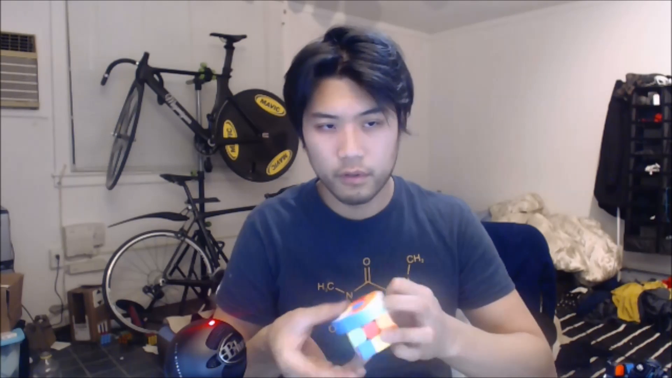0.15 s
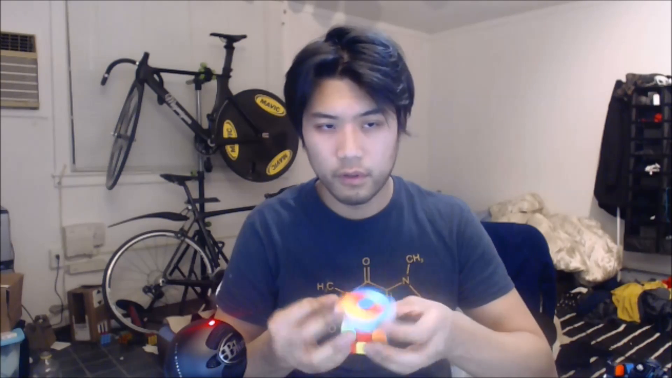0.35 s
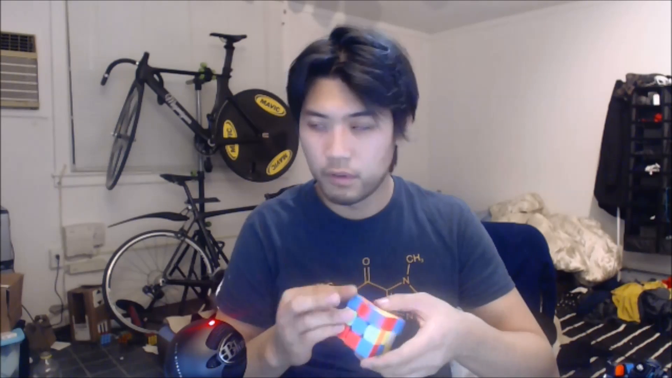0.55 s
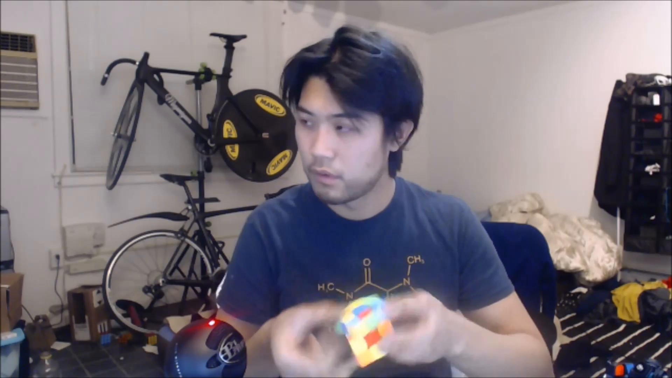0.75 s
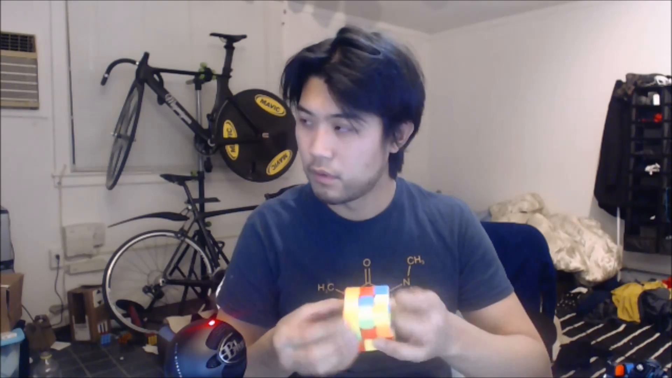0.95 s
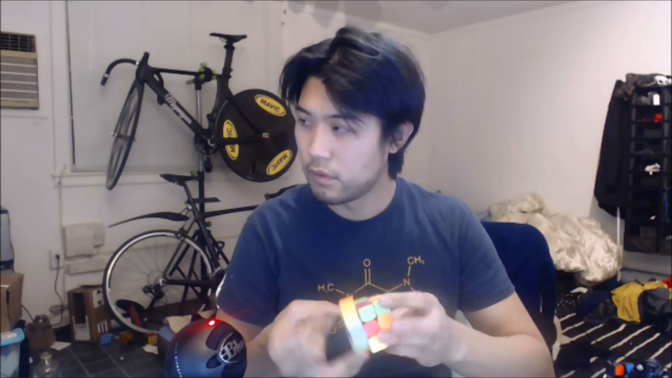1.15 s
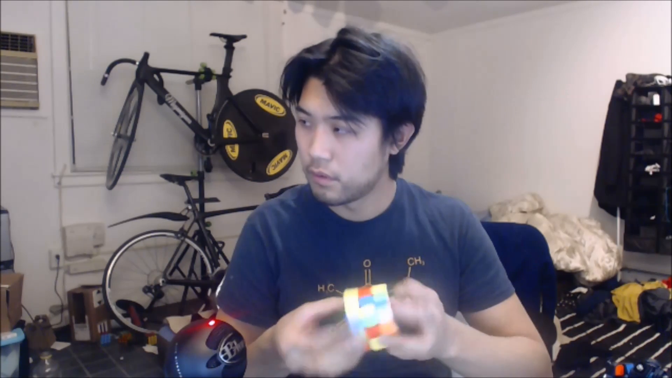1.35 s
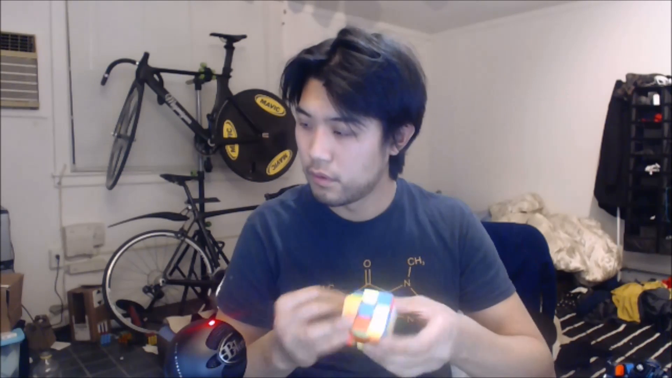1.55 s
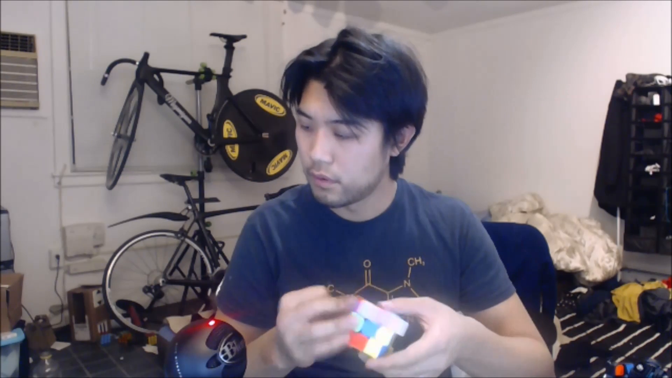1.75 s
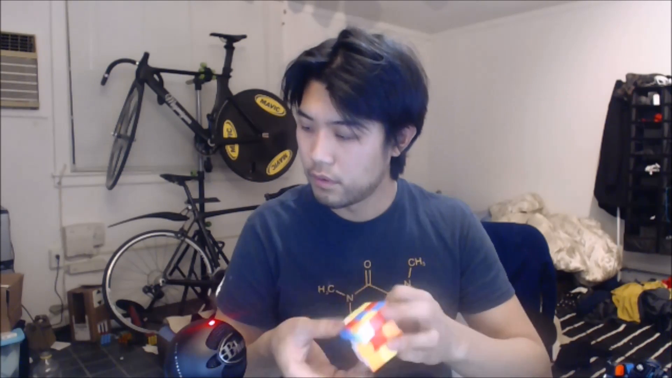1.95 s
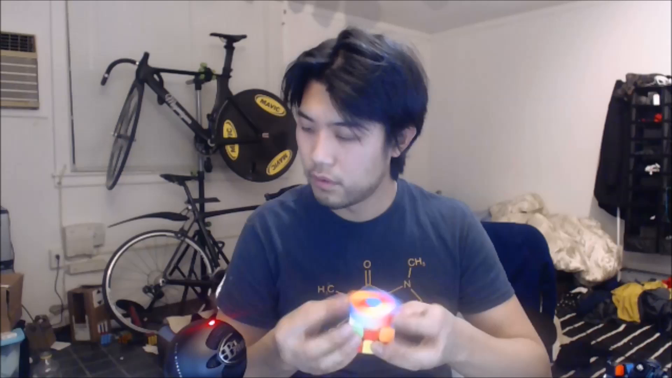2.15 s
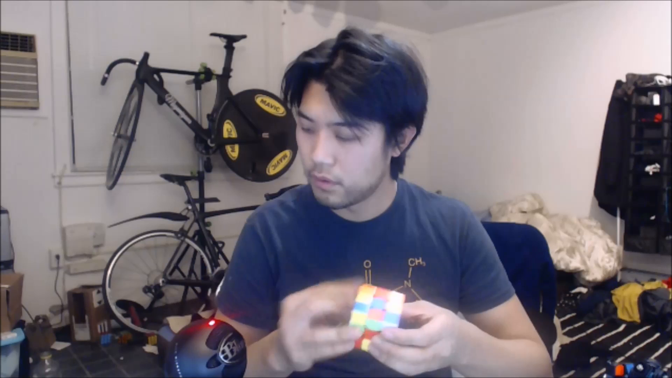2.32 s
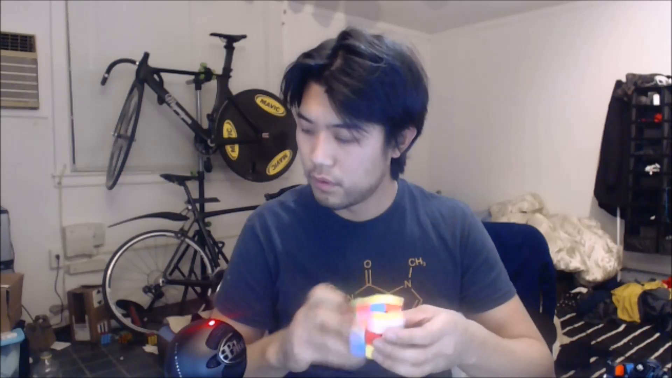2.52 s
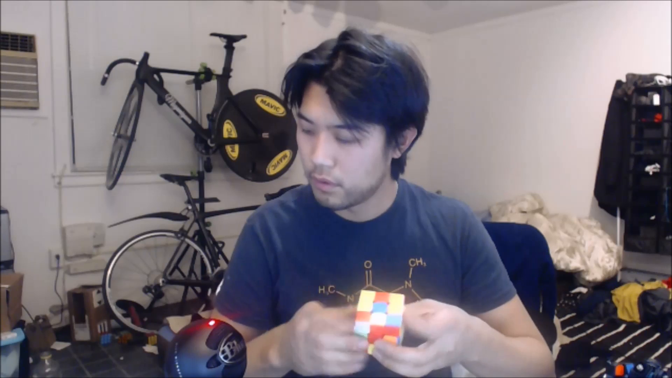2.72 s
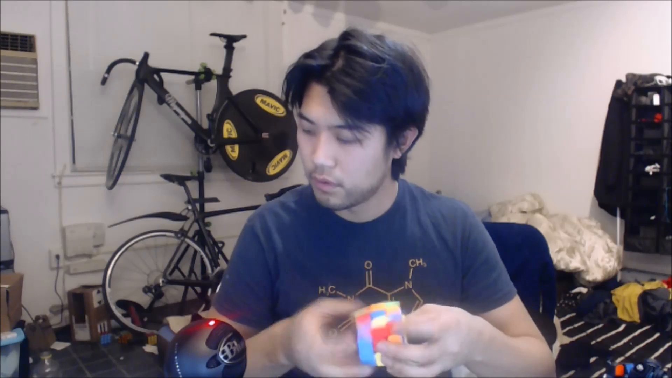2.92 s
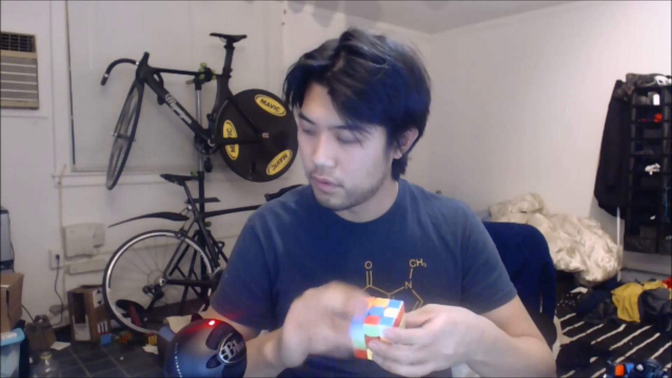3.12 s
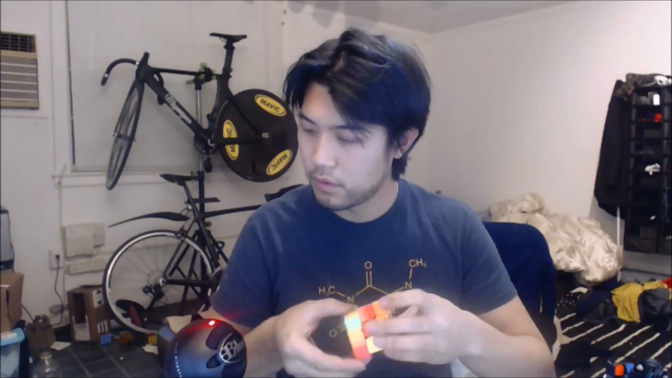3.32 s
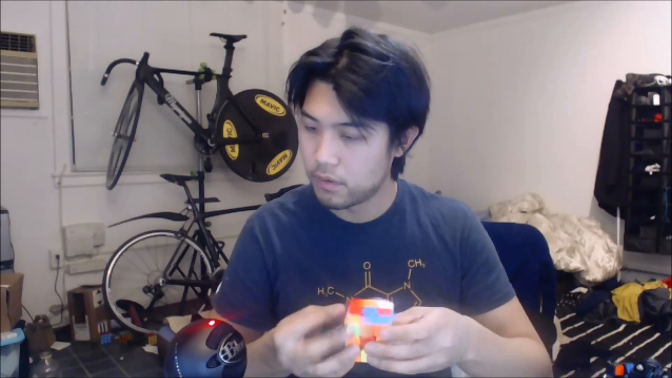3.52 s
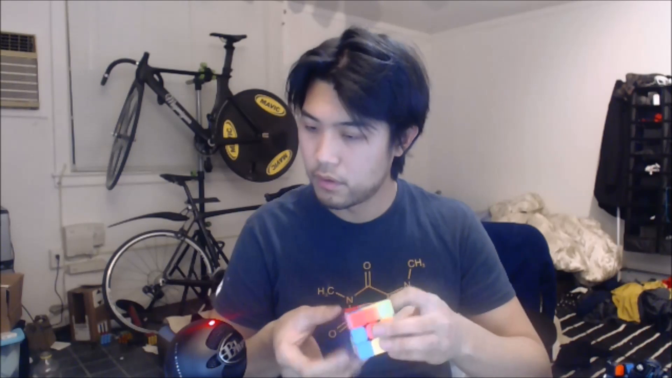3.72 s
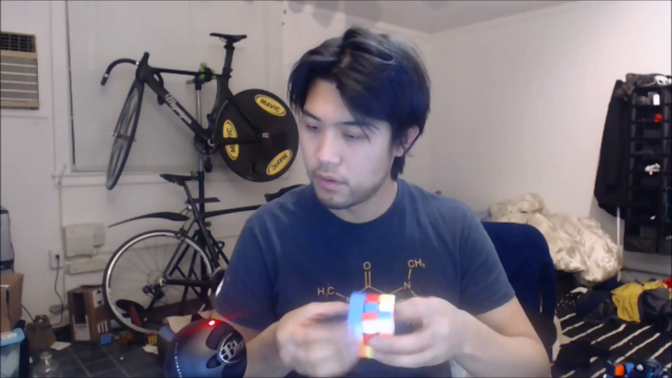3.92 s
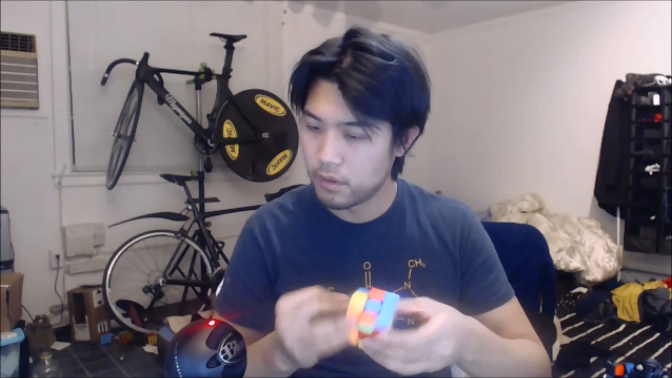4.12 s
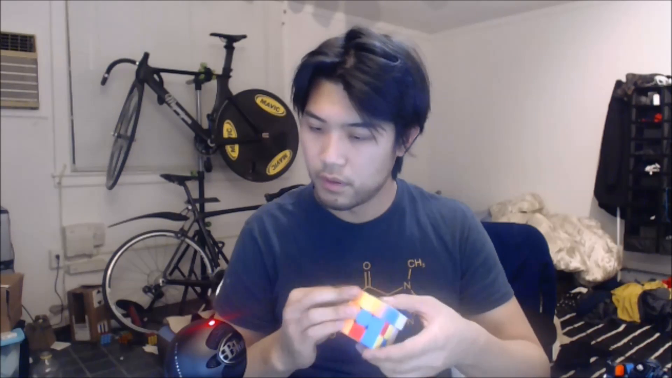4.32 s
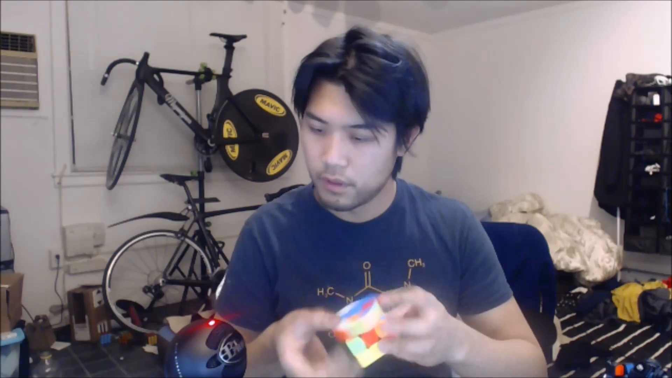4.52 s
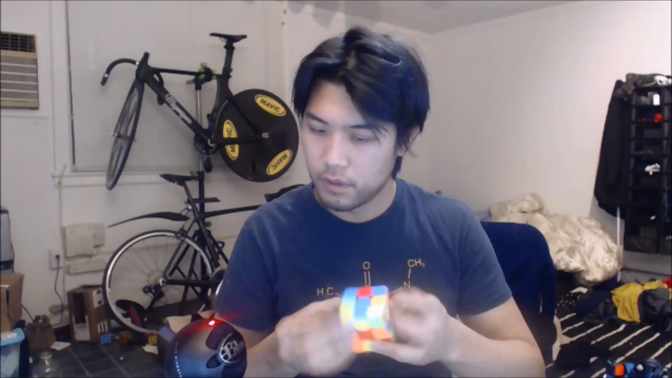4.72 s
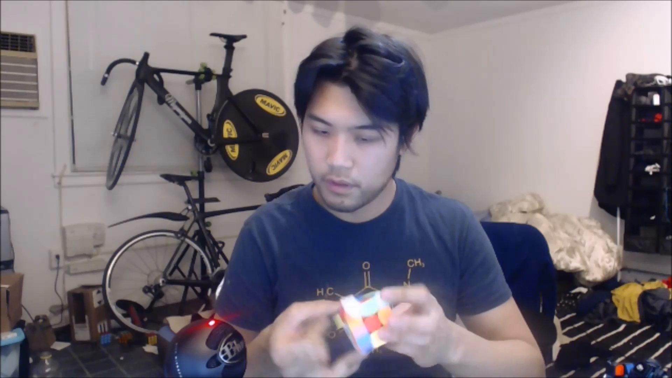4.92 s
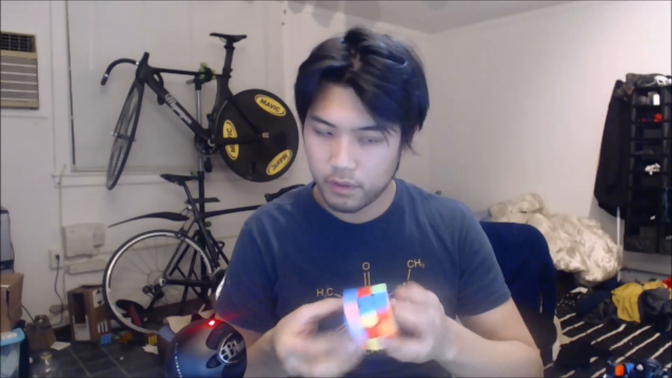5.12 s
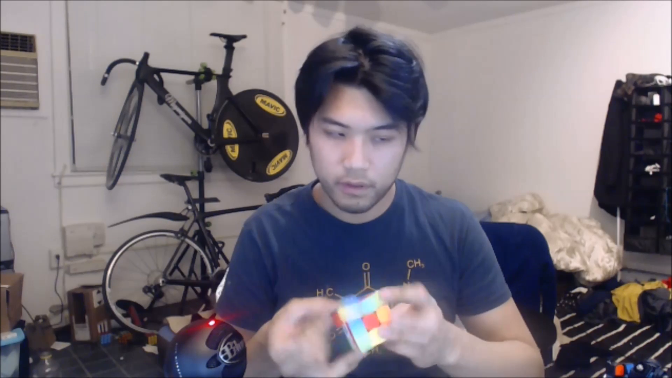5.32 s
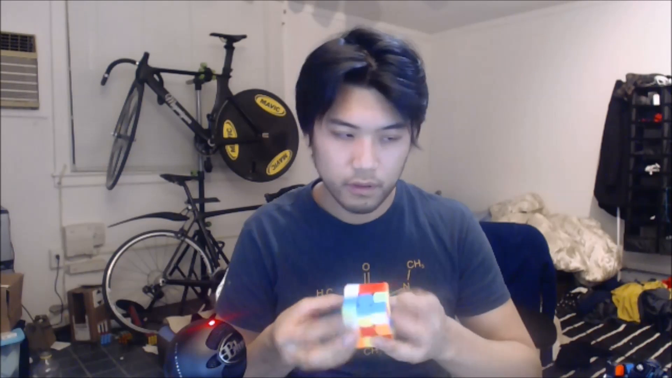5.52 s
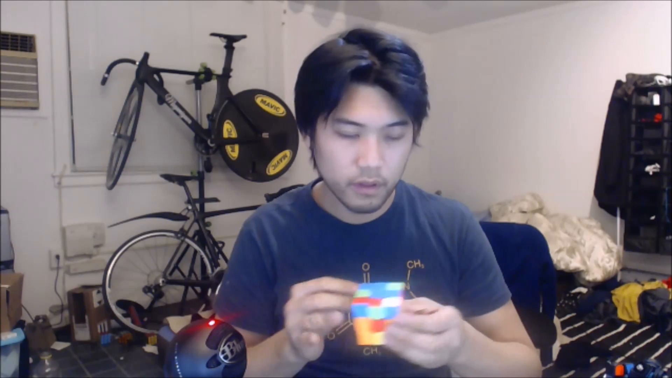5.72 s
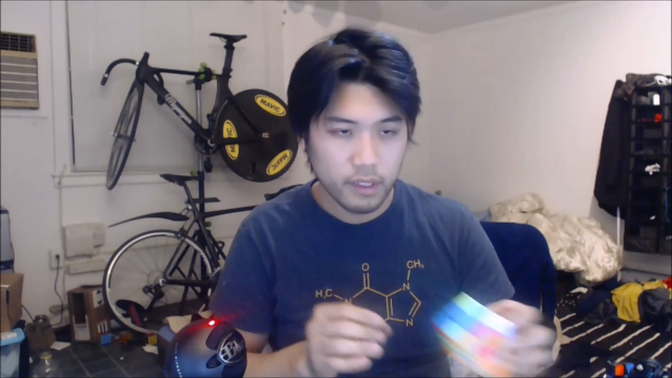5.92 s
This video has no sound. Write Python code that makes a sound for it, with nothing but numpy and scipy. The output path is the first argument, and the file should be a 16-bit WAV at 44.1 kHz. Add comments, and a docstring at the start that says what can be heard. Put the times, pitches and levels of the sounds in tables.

```python
"""In a small bedroom, a plastic speed cube is turned fast by hand near a webcam microphone.
Each turn rubs layer on layer (noise gated by small ticks); loose pieces clack (bursts of contact noise).
Both pass a colour filter (shells and microphone together), ring hollow (decaying modes) and echo in the room.
Moving hands add rumble, swings and thuds; below lie a fan's hum, room noise and a faint low rumble.
The microphone rounds off the highest peaks and cuts the top of the treble."""
import sys
import numpy as np
from scipy import signal
from scipy.fft import rfft, irfft
from scipy.io import wavfile
from scipy.ndimage import uniform_filter1d

SR = 44100
rng = np.random.default_rng(int(sys.argv[2]) if len(sys.argv) > 2 else 0)


def generate_wav(signal):
    """Clip the signal to [-1, 1] and save it as 16-bit WAV at the path in sys.argv[1]."""
    frames = np.transpose(np.atleast_2d(signal))
    scaled = np.clip(frames, -1, 1) * 32767
    pcm = np.round(scaled).astype(np.int16)
    wavfile.write(sys.argv[1], SR, pcm)


N = 267069


def undb(db):
    """Level: decibels become an amplitude ratio."""
    return 10 ** (np.asarray(db) / 20)


def unit(x):
    """Normalisation: scale to an rms of 1."""
    return x / np.sqrt(np.mean(x ** 2) + 1e-24)


def curve(rows):
    """Linear interpolation: join (t/s, value) rows by straight lines."""
    s, value = np.transpose(rows)
    return np.interp(np.arange(N) / SR, s, value)


def response(points, size=2048):
    """Minimum phase: folding the cepstrum gives a causal impulse response of the given (f/Hz, level/dB)."""
    hz, db = np.transpose(points)
    grid = np.maximum(np.fft.rfftfreq(size, 1 / SR), 1)
    level_db = np.interp(np.log(grid), np.log(hz), db)
    cepstrum = irfft(np.log(undb(level_db)))
    cepstrum[1:size // 2] *= 2
    cepstrum[size // 2 + 1:] = 0
    return irfft(np.exp(rfft(cepstrum)))


def through(x, impulse):
    """Linear filtering: convolve, keeping the length."""
    return signal.fftconvolve(x, impulse)[:len(x)]


def noise(points):
    """Spectral shaping: white noise filtered to the given colour, rms 1."""
    return unit(through(rng.standard_normal(N), response(points, size=16384)))


def split(x, hz, order=4):
    """Band splitting: the parts below and above a frequency."""
    low = signal.butter(order, hz, "low", fs=SR, output="sos")
    high = signal.butter(order, hz, "high", fs=SR, output="sos")
    return signal.sosfilt(low, x), signal.sosfilt(high, x)


# Clacks of pieces snapping home: t/s, level/dB (before the room), hollow ring re clack (relative)/dB,
# time scale of the contact/ms
CLACK_EVENTS = [(.018, -20, -7, 0.73), (.036, -4, -13, 1.5), (.080, -22, 3, 1.7), (.137, -14, 6, 2.6),
                (.158, -14.5, -1, 4), (.196, -19, 6, 2.6), (.262, -20, 12, 2.4), (.270, -17, -15, 0.84),
                (.324, -19, 5.5, 2.5), (.339, -11, -5, 2.6), (.423, -19.5, -3, 3), (.510, -21, 3.5, 2.8),
                (.628, -12.5, 1.5, 6.7), (.700, -12, -0.5, 2.3), (.739, -14, 1.5, 1.8), (.769, -11, 1, 1),
                (.784, -13.5, -5, 1.5), (.792, -18, -2, 1.3), (.810, -6.5, -6, 1.5), (.832, -14.5, 1, 2.4),
                (.857, -17, 4, 2.2), (.876, -24.5, -10, 2.3), (.915, -17.5, 2.5, 1.6),
                (.930, -1, -4.5, 1.9), (.950, -16, -16, 2.1), (.968, -19, 1, 1.7), (1.076, -8.5, -6, 1.7),
                (1.147, -9, -2.5, 3.2), (1.159, -1, -8, 3.5), (1.205, -20.5, 8, 1.8),
                (1.245, -9.5, -3, 1.6), (1.268, -16.5, 8, 5.2), (1.341, -16, 7.5, 2.6),
                (1.360, -2.5, -22, 1.3), (1.372, -20.5, 5, 1.8), (1.397, -19, -1, 1.8),
                (1.452, -16, 3.5, 4.4), (1.471, -13, -2, 1.2), (1.482, -13, 1.5, 3.5),
                (1.558, -16, -9, 0.52), (1.571, -19.5, 1, 2.8), (1.728, -22, 9, 2.1),
                (1.740, -23.5, 10.5, 2.8), (1.777, -19, -2, 1.4), (1.807, -12, 1.5, 6.4),
                (1.814, -13.5, 1, 4.5), (1.858, -11.5, -2.5, 2.4), (1.887, -18, 7.5, 1),
                (1.901, -20, -18, .7), (1.926, -11.5, -2.5, 3), (1.962, -10, 3, 3.7), (1.979, -20, 1, 2.2),
                (1.987, -15, -17, 3.4), (2.010, -23.5, -12, 2), (2.045, -13, 4, 1.25),
                (2.061, -5.5, -3, 1.9), (2.105, -25.5, 11.5, 0.84), (2.188, -19, 4, 3.2),
                (2.203, -14, 3.5, 2.4), (2.279, -16, -1.5, 5.9), (2.352, -33, 7.5, 2.4),
                (2.373, -25.5, -4, 0.76), (2.429, -21.5, -5, 1.8), (2.460, -22, 8.5, 2.1),
                (2.476, -20, -10, 1.4), (2.553, -8.5, -14, 2.3), (2.582, -18, -14, 1.2),
                (2.590, -11.5, 4, 3.9), (2.666, -18, 4, 2.9), (2.781, -21, 6.5, 1.2), (2.852, -13, 1, 4.7),
                (2.910, -22, 5, 1.5), (2.926, -15, 5.5, 1.9), (2.946, -1, -7, 3.2), (2.965, -5, -7, 1.5),
                (2.984, -8, 4, 1.6), (2.997, -7, -0.5, 1.8), (3.024, -19, -17, 0.56), (3.120, -23, 2.5, 2),
                (3.192, -11, 1.5, 2.4), (3.227, -19, -10, 2.4), (3.241, -19, -15, 4.5), (3.257, -16, 5, 1),
                (3.310, -34, 15.5, 1), (3.349, -28.5, 6, 2.7), (3.389, -4.5, -12, 1.85),
                (3.398, -11, -14, 2.6), (3.413, -12, -5, 3.8), (3.559, -17, 2.5, 1.9),
                (3.619, -4.5, -9, 6.1), (3.631, -3.5, -28, 2.2), (3.676, -13, -1, 2.6),
                (3.710, -8.5, -1, 2.2), (3.731, -17.5, -1, 5.6), (3.741, -13, -5, 2.5),
                (3.751, -15.5, 4, 0.78), (3.908, -16, 4.5, 3.6), (3.921, -12, -10, 3.7),
                (3.929, -13, 2, 2.3), (3.954, -25, 7.5, 0.92), (4.051, -11.5, 1.5, 2.1),
                (4.123, -10.5, 0, 1.4), (4.161, -17, -5, 0.78), (4.324, -21, 6.5, 9.2),
                (4.341, -15.5, 6, 2), (4.401, -10.5, -0.5, 1.04), (4.411, -17, -3, 4.2),
                (4.465, -12, -5, 1.2), (4.469, -16.5, -1, 2.1), (4.499, -20, 5, 2.7),
                (4.543, -13.5, 2, 2.2), (4.563, -18, 7.5, 1.8), (4.655, -13, 4.5, 4.3),
                (4.674, -2.5, -8, 1.06), (4.708, -12.5, -14, 1.6), (4.826, -21, 3.5, 1.7),
                (4.836, -6, 1.5, 1.8), (4.848, -9.5, -21, 2.4), (4.888, -23, 5, 3), (4.910, 0, -13, 4),
                (4.936, -18, -12, 0.67), (4.952, -16, 1, 2), (4.988, -15, -3, 0.61),
                (5.001, -7.5, -4.5, 2.2), (5.018, -15, 2, 1.1), (5.039, -23, 2, 2.1),
                (5.077, -20.5, 3, 4.2), (5.121, -9.5, 0.5, 2.5), (5.137, -12.5, -6, 1.9),
                (5.218, -13.5, 0.5, 1.6), (5.234, -24, 5, 2.1), (5.298, -11, -3, 3.6),
                (5.309, -8.5, -2.5, 2.9), (5.354, -18, 2, 1.4), (5.382, -10, 0, 3.1),
                (5.394, -10.5, 3.5, 4), (5.414, -8.5, -6, 4.6), (5.450, -19.5, 9, 1.4),
                (5.490, -22, 1, 2.8), (5.506, -15, 5, 0.91), (5.573, -18.5, 2, 2.8), (5.586, -6, -0.5, 2.5),
                (5.598, -10.5, -4, 3.6), (5.651, -17.5, 6, 2.7), (5.79, -54, -14, 1.5)]
# The treble share varies from clack to clack, and falls very slightly as the level rises
BRIGHT_SPREAD_DB, BRIGHT_DB_PER_DB = 2.5, -0.01


def clacks(rows, rough=0.64, swell=1.47, decay=0.67, steep=1.06, scrape_db=-17, knock=0.52, grip=0.004,
           grip_db=1.5, treble_db=-0.05, hollow_db=-5.0, split_hz=6800, own_ring=0.77, size=2048):
    """Impact excitation: a scrape and a cluster of tiny contacts make the clack; a blow adds to its ring."""
    lead = size // 4
    out = np.zeros(N + 2 * size)
    middle, treble = split(cube_response(), split_hz)
    ms = 1000 * (np.arange(size) - lead) / SR
    scale = np.sqrt(.005 * SR / size)  # refers levels to the rms over 5 ms
    scrape = undb(scrape_db) * np.exp(-np.abs(ms) / 3.5)  # the edges touch before they snap home
    blow = signal.unit_impulse(size, lead + SR // 2000)  # 0.5 ms after the stated moment
    for s, db, ring_db, length_ms in rows:
        # the blow spreads from piece to piece, then dies
        age = np.maximum(ms, 0) / max(length_ms, .5)
        cluster = age ** swell * np.exp(-(age / decay) ** steep)
        contacts = rng.standard_normal(size) * np.exp(rough * rng.standard_normal(size))
        contacts *= scrape + cluster / cluster.max()

        # each piece has a pitch of its own
        piece = signal.iirpeak(rng.uniform(3300, 9000), 9, fs=SR)
        own = contacts + own_ring * signal.lfilter(*piece, contacts)
        bright = undb(BRIGHT_DB_PER_DB * db + BRIGHT_SPREAD_DB * rng.standard_normal())
        clack = unit(through(own, middle)) + undb(treble_db) * bright * unit(through(own, treble))
        clack /= np.hypot(1, bright)  # brightness hardly changes the level

        ring = hollow_ring(1 + grip * rng.standard_normal(), grip_db * rng.standard_normal(len(HOLLOW_MODES)))
        driven_ring = through(unit(contacts) + knock * unit(blow), ring)
        hollow = undb(ring_db + hollow_db) * unit(driven_ring)

        start = max(int(s * SR), 0)
        out[start:start + size] += undb(db) * scale * (clack + hollow)
    return out[lead:lead + N]


# Small clacks of loose pieces: mean level re the rubbing and spread in dB
LOOSE_DB, LOOSE_SPREAD_DB = 2.5, 3.5
# Their mean hollow ring in dB (relative, as in the clack table) and median contact time scale in ms
LOOSE_RING_DB, LOOSE_MS = 3.5, 1.86


def loose_pieces(effort, count=200):
    """Random impacts: clack rows at chance moments, their level following the effort of turning."""
    s = (np.arange(count) + rng.random(count)) / count * (N - 1) / SR
    force, ring, length = rng.standard_normal((count, 3)).T
    effort_db = 20 * np.log10(effort[(s * SR).astype(int)])
    db = effort_db + LOOSE_DB + LOOSE_SPREAD_DB * np.clip(force, -2, 1)
    ring_db = LOOSE_RING_DB + LOOSE_SPREAD_DB * ring
    return np.transpose([s, db, ring_db, LOOSE_MS * np.exp(0.49 * length)])


# Turns of a layer: start t/s, length/s, level of the rubbing (effort)/dB
LAYER_TURNS = [(0, 0.039, -20), (0.096, 0.1, -26), (0.227, 0.047, -28), (0.308, 0.053, -24.5),
               (0.389, 0.06, -29), (.6, 0.052, -22.5), (0.657, 0.051, -28.5), (0.751, 0.12, -23.5),
               (0.906, .06, -25), (1.042, 0.045, -24), (1.13, 0.029, -27.5), (1.195, .12, -29),
               (1.334, 0.073, -23.5), (1.452, .04, -33.5), (1.526, 0.029, -25), (1.602, 0.041, -32.5),
               (1.739, 0.071, -27.5), (1.8, 0.12, -29.5), (1.972, 0.096, -33.5), (2.037, 0.058, -24.5),
               (2.175, .04, -29), (2.255, 0.025, -27), (2.443, 0.053, -26.5), (2.534, 0.056, -25),
               (2.632, .03, -28), (2.756, 0.16, -32.5), (2.908, 0.076, -21.5), (3.072, 0.044, -34),
               (3.166, 0.069, -27.5), (3.272, 0.027, -33), (3.345, .04, -36.5), (3.381, .045, -25),
               (3.519, 0.05, -28), (3.599, 0.068, -23.5), (3.696, 0.067, -28), (3.891, 0.062, -23),
               (4.022, 0.046, -26), (4.096, 0.046, -26), (4.165, 0.058, -33.5), (4.31, 0.087, -29),
               (4.393, 0.053, -29.5), (4.5, 0.08, -26.5), (4.645, 0.071, -25), (4.814, 0.014, -23),
               (4.884, 0.028, -15.5), (4.98, .04, -19.5), (5.085, 0.13, -33), (5.18, 0.075, -28),
               (5.305, 0.017, -27.5), (5.337, 0.13, -26), (5.486, 0.027, -22.5), (5.559, 0.042, -24),
               (5.623, 0.023, -27)]
TURN_ATTACK_S, TURN_RELEASE_S = 0.0069, 0.022  # the finger gets the layer moving; it coasts to rest
GRIP_RUB_DB, LET_GO_S = -47, 5.68  # the layers shift faintly as long as the cube is gripped


def turning():
    """Amplitude envelope: the rubbing of each turn rises, holds and decays exponentially."""
    t = np.arange(N) / SR
    effort = undb(GRIP_RUB_DB) * np.exp(-np.maximum(t - LET_GO_S, 0) / TURN_RELEASE_S)
    for s, length_s, db in LAYER_TURNS:
        span = slice(max(int(s * SR), 0), int((s + length_s) * SR) + SR // 2)
        age = t[span] - s
        rise = np.clip(age / TURN_ATTACK_S, 0, 1)
        coast = np.exp(-np.maximum(age - length_s, 0) / TURN_RELEASE_S)
        effort[span] = np.maximum(effort[span], undb(db) * rise * coast)
    return effort


def rattle(effort, per_second=330, tick_s=0.00064, hollow_db=-6, soft_hz=12000, rub=0.24, uneven_db=4):
    """Friction noise: edges catch in uneven ticks over a thin rub, coloured and ringing as the clacks are."""
    sizes = undb(uneven_db * np.clip(rng.standard_normal(N), -2, 2))
    ticks = (rng.random(N) < per_second / SR) * sizes
    age = np.arange(SR // 100) / (tick_s * SR)
    catching = rub + unit(through(ticks, age * np.exp(-age)))
    contacts = split(catching * rng.standard_normal(N), soft_hz, order=1)[0] * effort
    colour, ring = cube_response(), hollow_ring(0.98, np.zeros(len(HOLLOW_MODES)))
    body = colour / np.linalg.norm(colour) + undb(hollow_db) * ring / np.linalg.norm(ring)
    return through(contacts, body)


# Colour of the clacks and rubbing as the webcam hears them, shells and microphone together:
# f/Hz, level (relative)/dB
CUBE_COLOUR = [(200, -14.5), (620, -43.5), (1000, -10.5), (2100, -5.5), (2750, -10.5), (3400, -5.5),
               (3750, -9), (4800, 0.5), (5900, 2.5), (6750, -3.5), (8450, 2.5), (9700, -14.5), (13000, -5),
               (15800, -13.5)]


def cube_response():
    """Linear filtering: shells and microphone together give one colour to clacks and rubbing."""
    return response(CUBE_COLOUR)


# Hollow ring of the cube as the webcam hears it, microphone colour included:
# f/Hz, bandwidth/Hz, height of the resonance (relative)/dB
HOLLOW_MODES = [(521, 36, -2.5), (776, 61, -6.5), (1063, 21, -28), (1154, 37, 7.5), (1223, 89, 15.5),
                (1382, 82, 12.5), (1330, 50, 1), (1890, 910, -51.5)]


def hollow_ring(detune, weights_db, size=2048, leak_hz=640):
    """Modal synthesis: decaying modes start together; the grip shifts them and changes their shares."""
    hz, width_hz, db = np.transpose(HOLLOW_MODES)[:, :, None]
    t = np.arange(size) / SR
    gain = undb(db + weights_db[:, None]) * width_hz  # wide modes start higher for the same height
    modes = gain * np.exp(-np.pi * width_hz * t) * np.cos(2 * np.pi * hz * detune * t)
    return split(np.sum(modes, axis=0), leak_hz, order=2)[1]  # so small a body radiates little bass


# Echo of the room by band: upper edge f/Hz, t60/s, level (relative)/dB
ECHO_BANDS = [(2510, 0.23, -9), (8900, 0.25, -15), (17200, 0.071, -13.5)]


def room_tail(first_s, size=22050):
    """Diffuse reverberation: a random pattern of reflections; the top band dies soonest."""
    t = np.arange(size) / SR
    rest, tail = rng.standard_normal(size), 0
    for top_hz, t60, db in ECHO_BANDS:
        band, rest = split(rest, top_hz)
        fade = np.clip(t / first_s - .5, 0, 1) * np.exp(-np.log(1000) * t / t60)
        tail = tail + undb(db) * band * fade / np.linalg.norm(fade)
    return tail


def bedroom(x, first_s=0.002, count=24):
    """Time-varying reflection: desk and walls answer, the pattern changing as hands carry the cube."""
    hop = N // count + 1
    out = np.pad(x, (hop, 2 * hop + SR))
    direct = out.copy()
    for start in range(0, N + hop, hop):
        piece = direct[start:start + 2 * hop] * signal.windows.cosine(2 * hop)
        echo = signal.fftconvolve(piece, room_tail(first_s))
        out[start:start + len(echo)] += echo
    return out[hop:hop + N]


# Low rumble of the moving hands and arms: t/s, level (relative)/dB
ARM_RUMBLE = [(0, -22.5), (2.4, -21.5), (2.85, -23.5), (3.5, -28), (5.3, -21), (5.67, -17.5), (5.74, -30.5),
              (6.06, -43.5)]
# Colour of that rumble: f/Hz, spectral density (relative)/dB
ARM_RUMBLE_COLOUR = [(8, 6.5), (22, 17), (35, -4.5), (60, -20), (100, -10.5), (200, -33.5), (500, -61.5)]
# Wrist flicks: t/s, peak of the swing (relative)/dB, thud of the palms (relative)/dB
WRIST_FLICKS = [(.04, -14, -40), (.368, -15, -34.5), (0.437, -11, -42), (.655, -16, -34), (.712, -16, -41),
                (0.939, -15, -52), (1.103, -16, -40), (1.166, -11, -30), (1.496, -15.5, -36),
                (1.569, -15, -48), (1.673, -19.5, -49), (1.79, -23, -39.5), (1.831, -17, -48),
                (2.068, -16.5, -50), (2.246, -17.5, -53), (2.298, -13, -45), (2.384, -13.5, -45),
                (2.466, -13.5, -54), (3.584, -13, -47), (3.638, -11.5, -33), (4.081, -18.5, -37),
                (4.149, -14, -40), (4.429, -17, -50), (4.674, -18.5, -35.5), (4.869, -16, -36),
                (4.909, -11.5, -29), (5.261, -17, -38.5), (5.319, -14.5, -42), (5.621, -24.5, -46),
                (5.671, -19, -46)]
# A flick of this tabled level swings at this rate; each dB more slows it by a factor exp(0.17)
SWING_HZ, SWING_AT_DB, SWING_SLOWER_PER_DB = 44.5, -16.5, 0.17
SWING_SPREAD = 0.082  # log spread of the rate: no two flicks are equally quick


def handling(rumble_db=-4, bump_db=-1, cycles=0.52, palm_db=1, palm_hz=210, palm_s=0.013):
    """Low-frequency excitation: arms rumble; each wrist flick adds one slow swing and a soft palm thud."""
    rumble = noise(ARM_RUMBLE_COLOUR)
    rumble /= np.sqrt(uniform_filter1d(rumble ** 2, size=6000) + 1e-3)  # evens out chance swells
    below_palm = split(rng.standard_normal(N), palm_hz, order=2)[0]
    thud = unit(split(below_palm, 60, order=2)[1])
    out = undb(curve(ARM_RUMBLE) + rumble_db) * rumble
    for s, db, thud_db in WRIST_FLICKS:
        span = np.arange(max(int((s - .1) * SR), 0), min(int((s + .1) * SR), N))
        t = span / SR - s
        slower = SWING_SLOWER_PER_DB * (SWING_AT_DB - db)
        hz = SWING_HZ * np.exp(slower + SWING_SPREAD * rng.standard_normal())
        swing = np.exp(-(t * hz / cycles) ** 2) * np.cos(2 * np.pi * hz * t)
        out[span] += undb(db + bump_db) * swing
        out[span] += undb(thud_db + palm_db) * np.exp(-(t / palm_s) ** 2) * thud[span]
    return out


# Steady hum of a fan: f/Hz, rms level/dB
FAN_HUM = [(92.8, -50.5), (350, -66), (1405, -57)]
# Colour of the room noise before its bass is cut: f/Hz, spectral density (relative)/dB
AIR_COLOUR = [(76, -49), (130, -17.5), (318, -9.5), (351, -9.5), (412, -12.5), (522, -11.5), (588, -14.5),
              (625, -22), (747, -13), (1250, -13.5), (2940, -31), (15000, -49)]
# Colour of the faint low rumble: f/Hz, spectral density (relative)/dB
LOW_RUMBLE_COLOUR = [(20, -2), (45, -2), (65, -4.5), (110, -27.5), (400, -62.5)]
AIR_DB, LOW_RUMBLE_DB = -47, -48  # rms levels


def background():
    """Stationary background: steady tones of a fan, shaped room noise and a faint low rumble."""
    t = np.arange(N) / SR
    hum = np.zeros(N)
    for hz, db in FAN_HUM:
        hum += undb(db) * np.sqrt(2) * np.sin(2 * np.pi * (hz * t + rng.random()))
    air = unit(split(noise(AIR_COLOUR), 105)[1])
    return hum + undb(AIR_DB) * air + undb(LOW_RUMBLE_DB) * noise(LOW_RUMBLE_COLOUR)


def scene():
    """Superposition: the cube in the room, over handling rumble and background."""
    effort = turning()
    cube = clacks(CLACK_EVENTS) + clacks(loose_pieces(effort)) + rattle(effort)
    return (bedroom(cube) + handling() + background())[None]


def record(dry, ceiling=0.86, top_hz=15850):
    """Saturation and band limiting: the microphone flattens the highest peaks and cuts the top."""
    clipped = dry / (1 + (dry / ceiling) ** 6) ** (1 / 6)
    return signal.sosfilt(signal.ellip(10, .2, 70, top_hz, fs=SR, output="sos"), clipped)


dry = scene()
out = record(dry)
generate_wav(out)
```